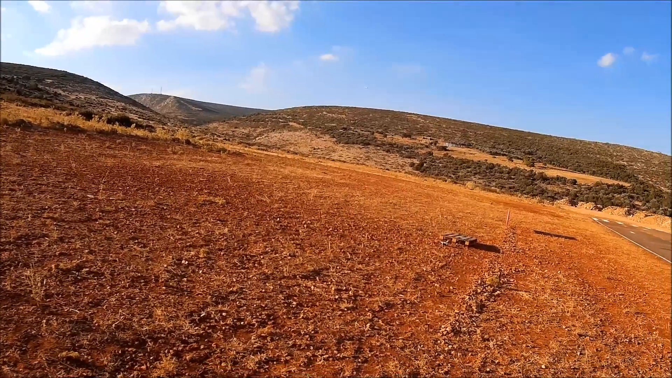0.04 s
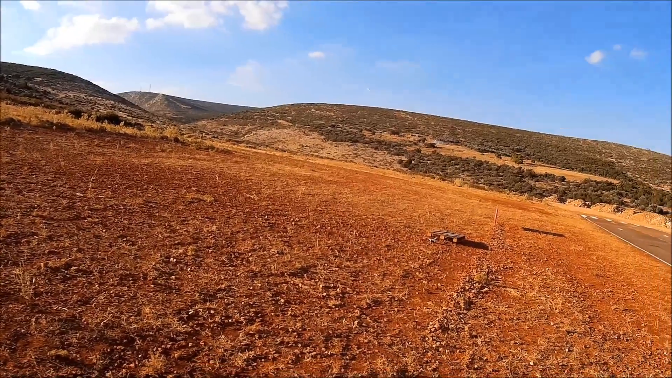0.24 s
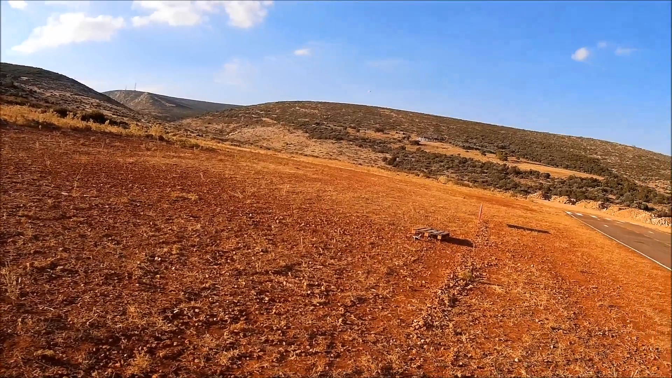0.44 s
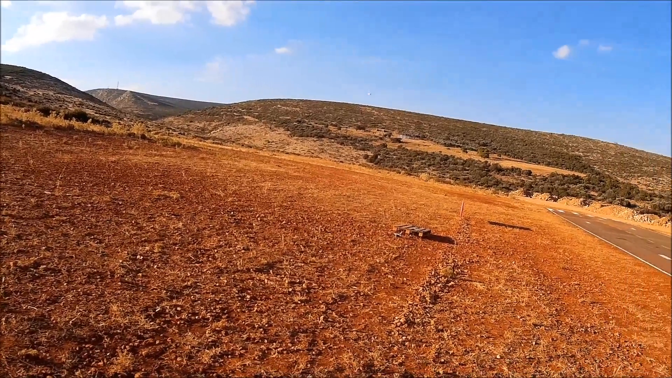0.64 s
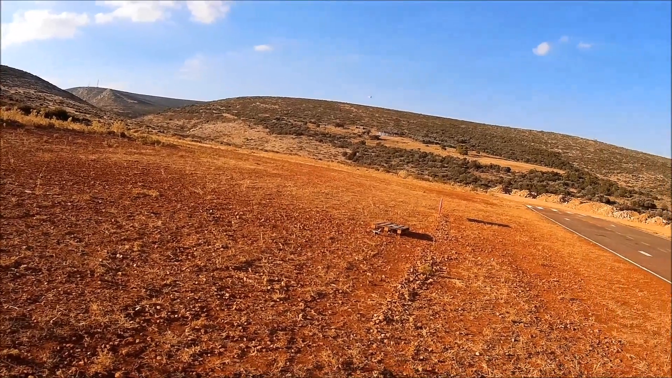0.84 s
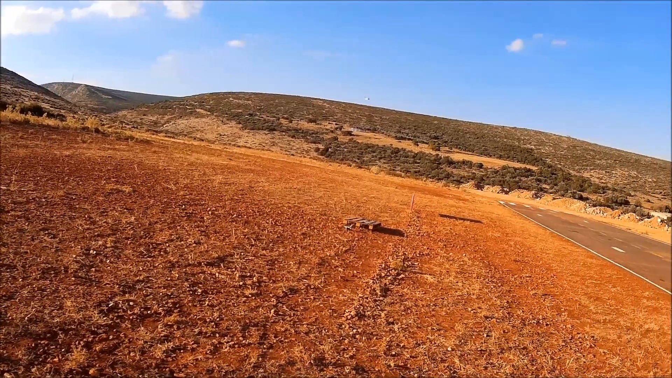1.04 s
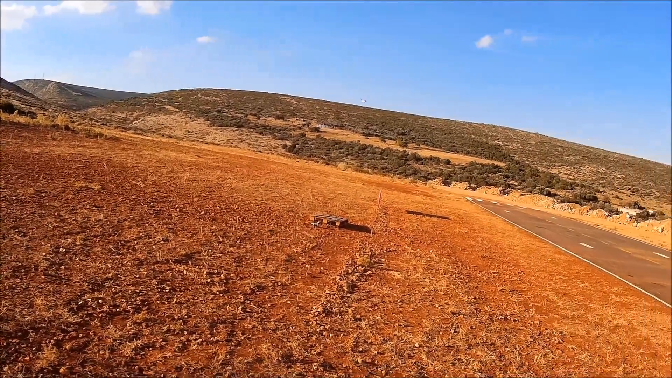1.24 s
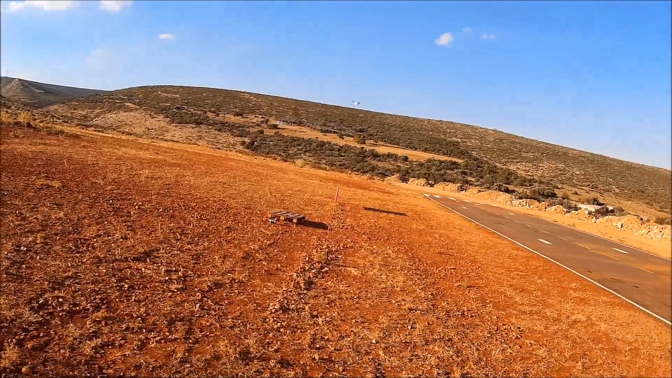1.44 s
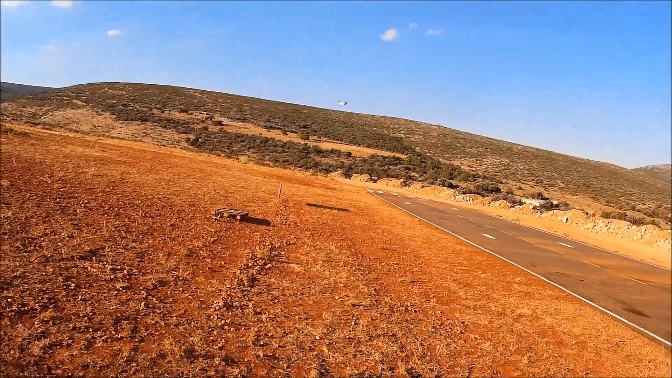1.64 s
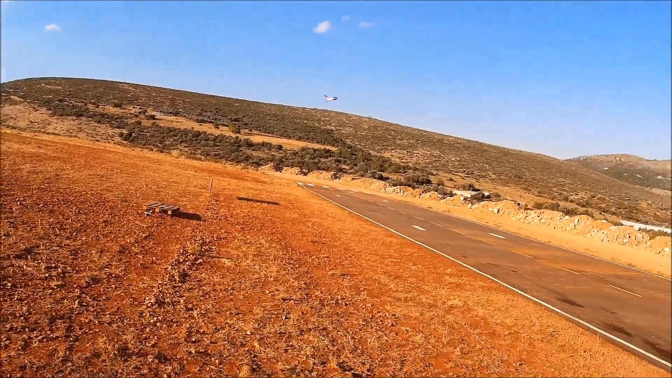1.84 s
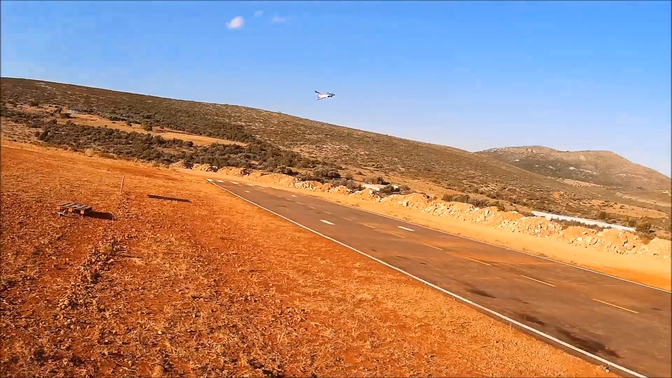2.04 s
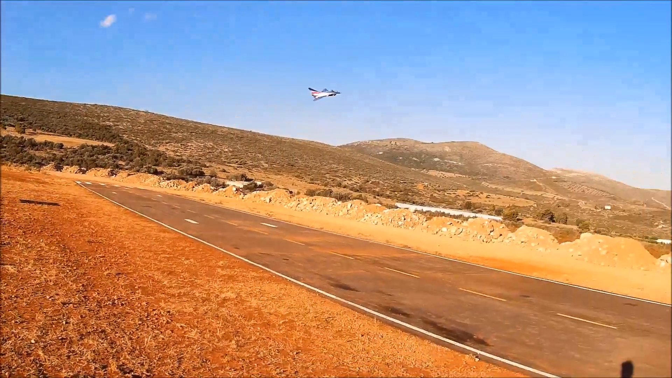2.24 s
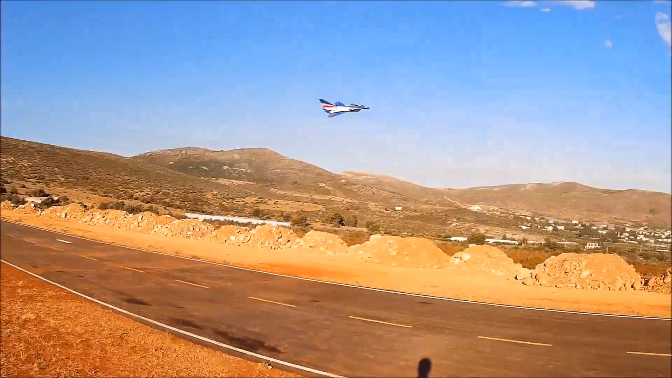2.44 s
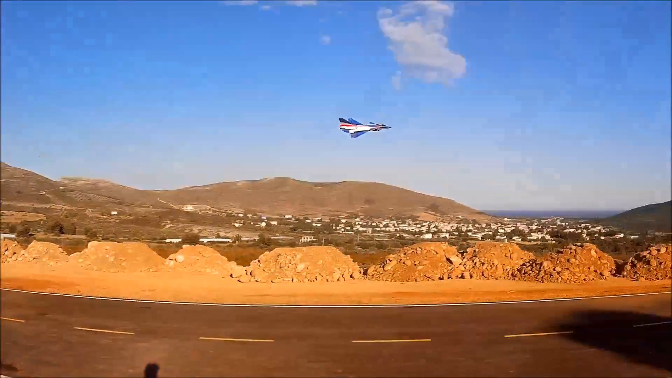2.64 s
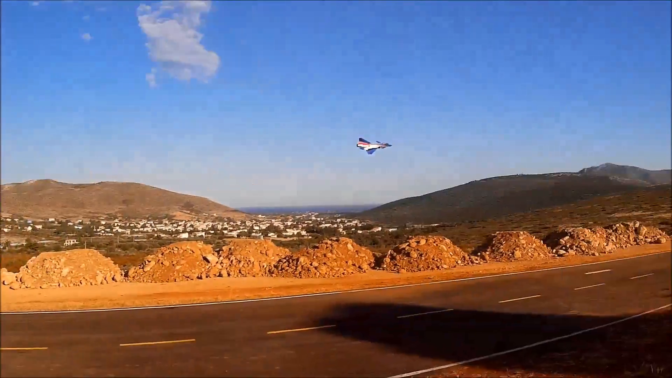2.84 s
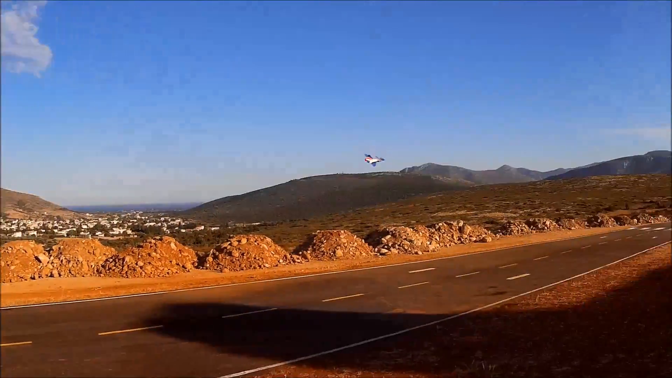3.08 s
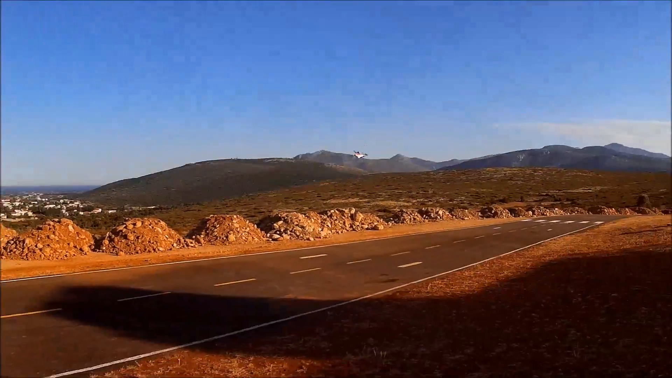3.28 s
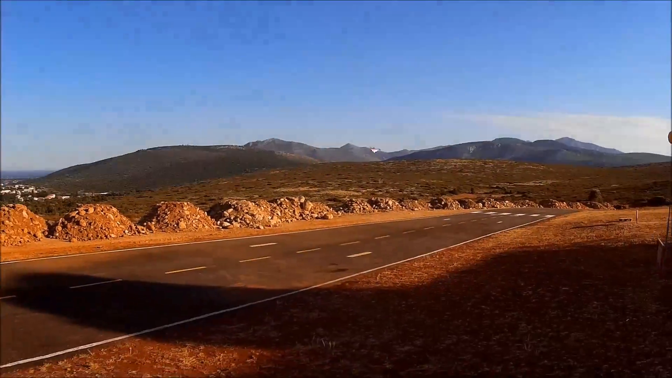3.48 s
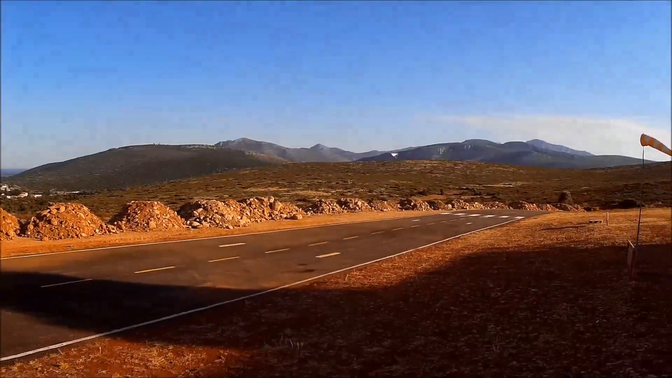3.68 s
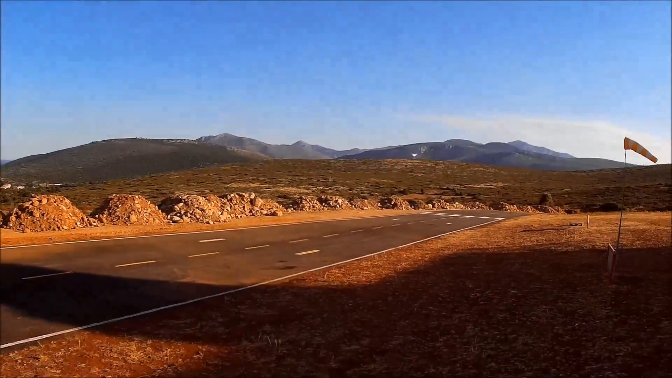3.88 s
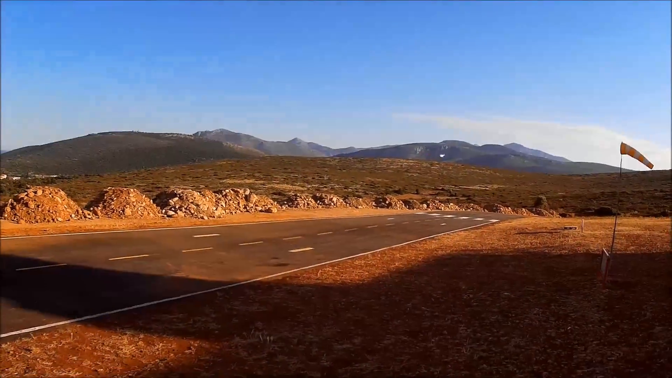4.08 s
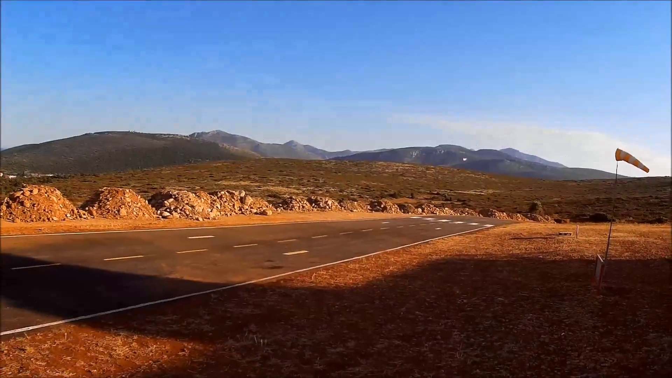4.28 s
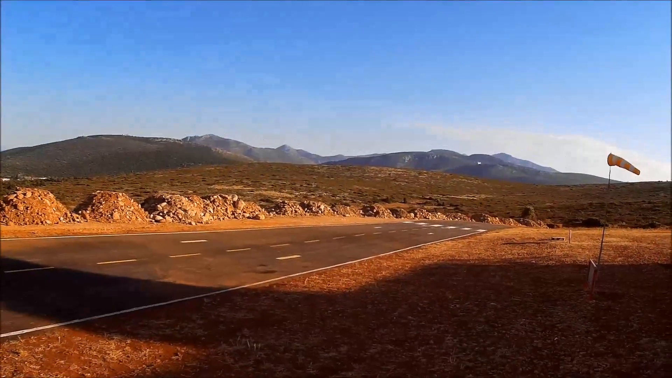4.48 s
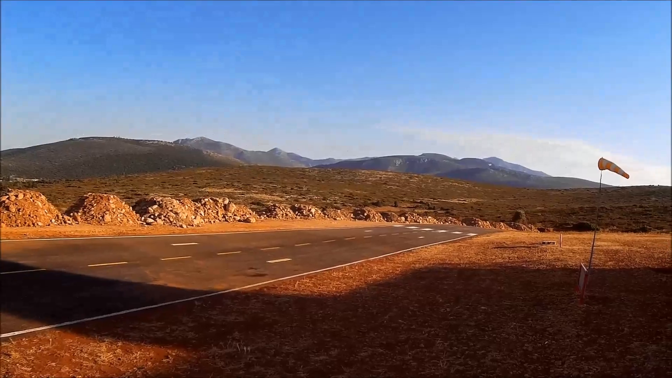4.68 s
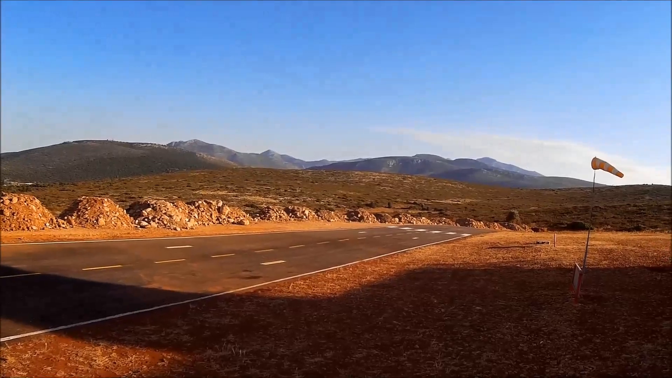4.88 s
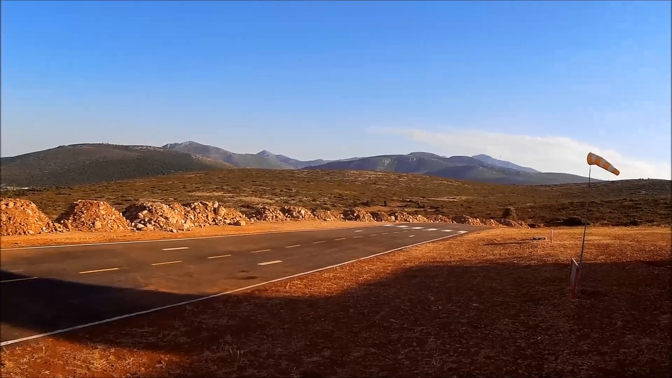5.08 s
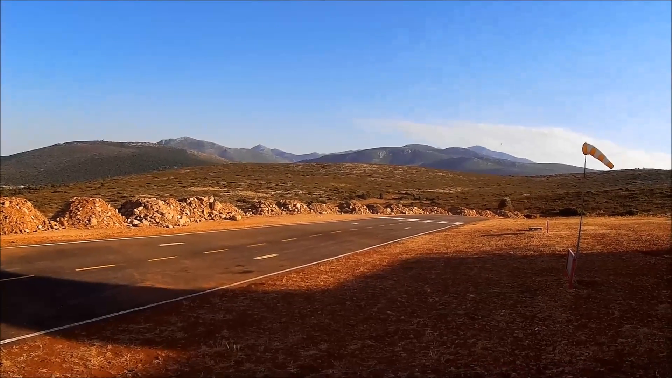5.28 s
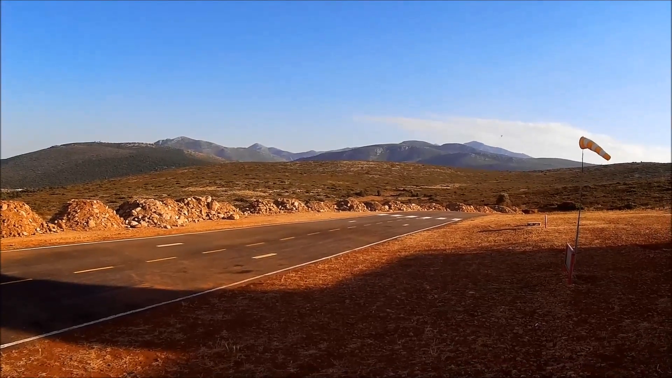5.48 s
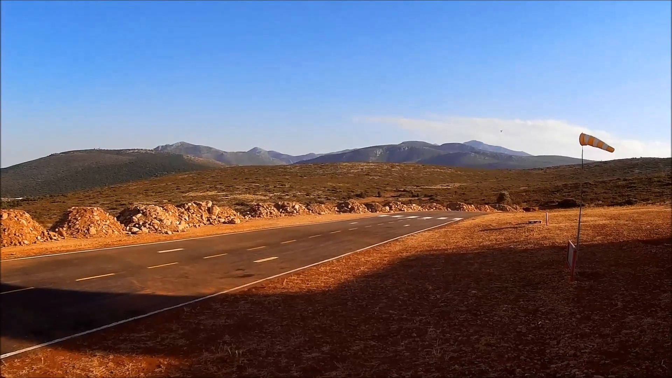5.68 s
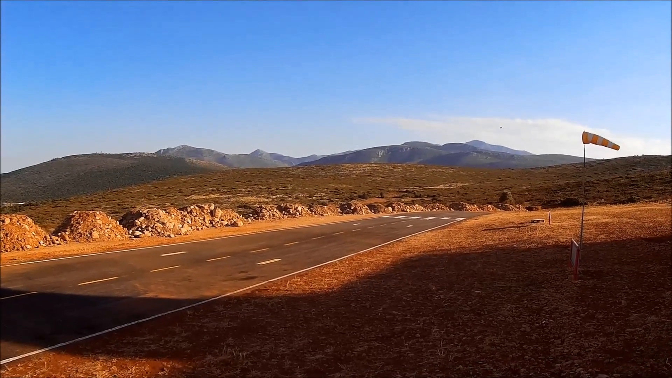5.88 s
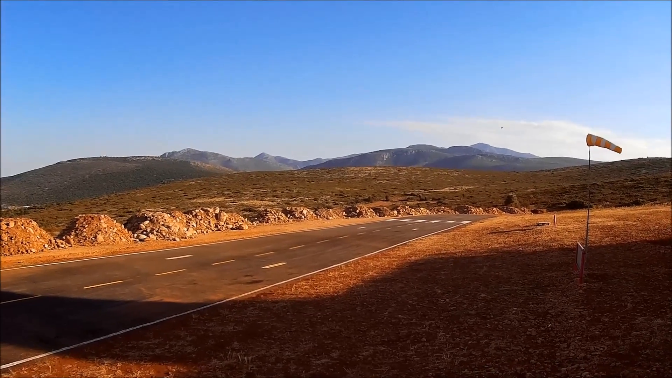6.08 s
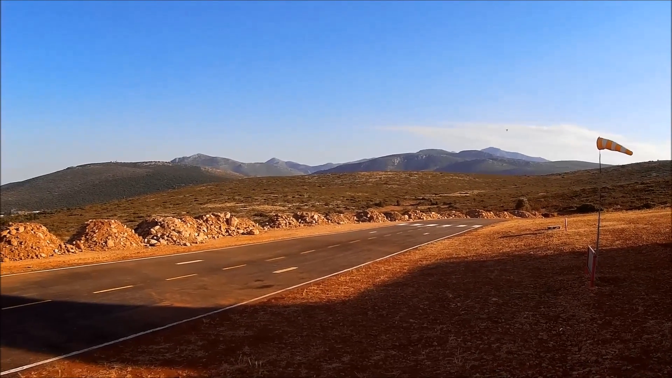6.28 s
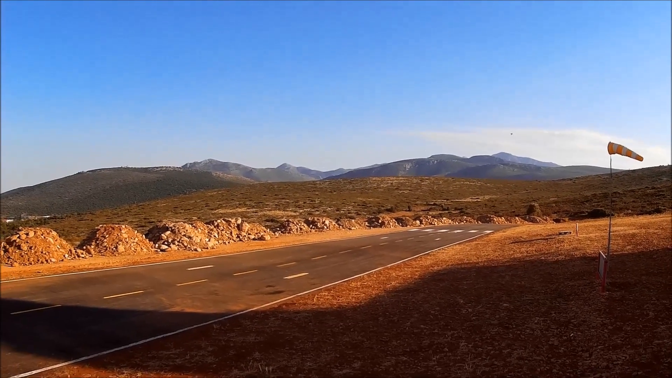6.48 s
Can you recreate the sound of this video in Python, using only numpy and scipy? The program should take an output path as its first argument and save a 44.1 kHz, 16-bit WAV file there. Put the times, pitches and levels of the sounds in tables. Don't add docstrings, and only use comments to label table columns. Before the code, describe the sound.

Open, dry countryside, heard through a small microphone with a ringing, bright treble. From 0 s a model jet approaches: a steady, fairly low electric fan whine, around 450 Hz with overtones, mixed with rushing blown air that surges and flickers, notably near 0.2, 0.5 and 0.9 s. It grows steadily from 1.5 s, while low wind thumps gather, strongest around 2.2 to 2.9 s. The jet passes closest at about 2.7 s, loud and hissy, its pitch gliding down by roughly a fifth to a quarter as a hollow, comb-like ground echo sweeps through the noise. Sharp wind slaps hit at 3.2 to 3.4 s. The whine quickly weakens and the rush recedes, duller and wavering, with brief swells near 4.1, 5.0 and 5.7 s. More gusts and small slaps come from 5.3 to 6.4 s. By 6.5 s the jet is faint above a barely audible wind murmur and slight hiss.

```python
import sys
import numpy as np
from scipy import signal
from scipy.fft import rfft, irfft, next_fast_len
from scipy.io import wavfile
from scipy.ndimage import map_coordinates

SR = 44100
rng = np.random.default_rng(int(sys.argv[2]) if len(sys.argv) > 2 else 0)


def linear_from_db(decibels):
    return 10 ** (np.asarray(decibels, float) / 20)


def to_wav(sig):
    pcm = np.clip(np.atleast_2d(sig), -1, 1) * 32767
    pcm = np.round(pcm).astype(np.int16)
    wavfile.write(sys.argv[1], SR, pcm.T)


N = 287708
SPEED_M_S, SOUND_M_S = 43.47, 343
MACH = SPEED_M_S / SOUND_M_S
PASS_M, PASS_S = 15.5, 2.6727
MIC_HEIGHT_M = 1.7


def noise():
    return rng.standard_normal(N)


def rms_one(x):
    return x / np.sqrt(np.mean(x ** 2) + 1e-20)


def in_time(rows):
    s, *columns = np.transpose(rows)
    return [np.interp(np.arange(N) / SR, s, c) for c in columns]


def bump(centre_s, half_s):
    return np.exp(-((np.arange(N) / SR - centre_s) / half_s) ** 2)


def drift(rate_hz):
    step = 40
    r = np.exp(-2 * np.pi * rate_hz * step / SR)
    start = rng.standard_normal(N // step + 2002)
    slow = signal.lfilter([1], [1, -2 * r, r * r], start)[2000:]
    return np.interp(np.arange(N) / step, np.arange(len(slow)), rms_one(slow))


def butter(x, kind, hz, order):
    return signal.sosfilt(signal.butter(order, hz, kind, fs=SR, output="sos"), x)


def coloured(x, points):
    size = next_fast_len(N)
    hz, level_db = np.transpose(points)
    shape = np.interp(np.log(np.arange(size // 2 + 1) * SR / size + 1), np.log(hz), level_db)
    return irfft(rfft(x, size) * linear_from_db(shape), size)[:N]


def split(x, edges_hz):
    size = next_fast_len(N)
    hz = np.arange(size // 2 + 1) * SR / size
    spectrum = rfft(x, size)
    below = [1 / (1 + (hz / edge) ** 12) for edge in edges_hz] + [1]
    return [irfft(spectrum * (b - a), size)[:N] for a, b in zip([0] + below, below)]


# [f/Hz, level/dB per Hz]
MURMUR_COLOUR = [(150, -15), (350, 3), (600, -4), (1200, -2), (2000, -16), (3800, -18), (6500, -26)]


def field():
    murmur = butter(coloured(noise(), MURMUR_COLOUR), "band", [120, 7000], order=2)
    return linear_from_db(-55.5 + 1.5 * drift(9)) * rms_one(murmur)


# [t/s, peak level/dB]
SLAPS = [(3.22, -21), (3.329, -20.5), (3.378, -21), (5.298, -31), (5.594, -23.5), (5.643, -30),
         (5.677, -32), (5.786, -20.5), (5.839, -23), (6.099, -27.5), (6.286, -31), (6.427, -28)]


def slaps():
    kicks = np.zeros(N) + 1e-18
    for s, peak_db in SLAPS:
        kicks[round(s * SR)] = linear_from_db(peak_db - 3.5) * rng.choice([-1, 1])
    r = linear_from_db(-60 / (0.051 * SR))
    w = 2 * np.pi * 210 / SR
    swing = signal.lfilter([0, np.sin(w)], [1, -2 * r * np.cos(w), r * r], kicks)
    return butter(swing, "low", 480, order=2)


# [t/s, half length/s, rumble level/dB, buffet level/dB]
GUSTS = [(.2, 0.07, -60, -55), (1.297, 0.034, -55, -48), (1.484, 0.063, -40, -47),
         (1.582, 0.035, -48, -42.5), (1.66, 0.028, -47, -44), (1.826, .12, -44, -51.5),
         (2.025, 0.061, -42, -40.5), (2.13, 0.048, -41, -36.5), (2.223, 0.029, -37, -31.5),
         (2.25, 0.025, -42, -35), (2.342, 0.069, -36, -31.5), (2.455, 0.049, -43, -37.5),
         (2.577, 0.048, -43, -31.5), (2.718, 0.062, -36, -31), (2.864, 0.056, -40, -40),
         (2.954, 0.034, -42, -46), (3.08, 0.046, -40.5, -46.5), (3.224, 0.035, -33.5, -31.5),
         (3.317, 0.022, -34, -33), (3.384, 0.017, -32, -30), (3.692, 0.49, -54.5, -61),
         (4.07, .06, -54, -76), (4.26, 0.065, -41, -49), (4.47, 0.072, -44.5, -44),
         (4.814, .15, -49, -57.5), (5.251, 0.082, -41, -51), (5.694, 0.072, -43, -35.5),
         (5.896, 0.063, -45, -39.5), (6.066, 0.07, -46, -51), (6.34, 0.19, -49.5, -49)]


def wind():
    rumble_gain, buffet_gain = linear_from_db(-58.5), linear_from_db(-66)
    for s, half_s, rumble_db, buffet_db in GUSTS:
        bell = bump(s, half_s)
        rumble_gain = rumble_gain + linear_from_db(rumble_db) * bell
        buffet_gain = buffet_gain + linear_from_db(buffet_db) * bell
    lumps = drift(37)
    rumble = rms_one(butter(noise(), "band", [20, 95], order=2))
    buffet = butter(butter(noise(), "band", [95, 290], order=2), "low", 510, order=2)
    thumps = rms_one(linear_from_db(2.55 * lumps) * buffet)
    return rumble_gain * linear_from_db(0.28 * lumps) * rumble + buffet_gain * thumps + slaps()


# [t/s, height/m]
HEIGHT = [(0, 17.75), (1, 10.66), (1.7, 6.95), (2.1, 6.81), (2.35, 6.28), (2.55, 6.3), (2.75, 5.83),
          (2.95, 5.7), (3.3, 5.88), (3.6, 5.71), (4.2, 7.07), (5, 10.14), (5.6, 14.5), (6.52, 20.5)]


def flight():
    t = np.arange(N) / SR - PASS_S + PASS_M / SOUND_M_S
    wait = np.sqrt(MACH ** 2 * t ** 2 + (1 - MACH ** 2) * (PASS_M / SOUND_M_S) ** 2)
    sent = (t - wait) / (1 - MACH ** 2)
    r = np.hypot(SPEED_M_S * sent, PASS_M)
    detour_m = np.sqrt(r ** 2 + 4 * MIC_HEIGHT_M * in_time(HEIGHT)[0]) - r
    return r, SPEED_M_S * sent / r, detour_m / SOUND_M_S * SR


# [t/s, gain/dB, half length/s, lean/dB per octave]
SWELLS = [(0.217, 7.5, 0.068, -3.5), (0.467, 6.5, 0.063, -2.5), (0.606, 5, 0.062, -3.5),
          (0.727, -1, 0.035, 0), (0.913, 9, 0.093, -2.5), (1.112, 0.5, .04, 0.5), (1.263, 2.5, 0.057, 2.2),
          (1.404, 0, 0.07, -1.5), (1.567, 3.5, 0.06, 2.5), (1.692, 4, 0.054, 1.5), (1.883, 2.5, 0.033, 3),
          (2.003, 3.5, 0.039, 0), (2.08, 3, 0.026, 1), (2.214, 1, 0.049, 2.8), (2.396, 1, 0.073, 0.6),
          (2.574, -0.5, 0.02, .3), (2.89, 2, 0.075, -0.6), (3.164, 3, 0.029, 1), (3.35, 1.5, 0.05, -1),
          (3.5, .5, 0.033, 1.5), (3.614, 2.5, 0.025, 0.5), (3.826, 2, 0.076, -1.5), (3.924, 1.5, 0.047, 0),
          (4.1, 3, 0.085, -4.2), (4.224, 3.5, 0.047, -0.5), (4.388, -0.5, 0.14, -1.5), (6.51, -1, .04, -12),
          (4.97, 7.5, 0.13, -3.5), (5.082, 1, 0.044, .5), (5.73, 7, 0.055, -5)]


def swell():
    return sum(np.outer([gain_db, lean_db], bump(s, half_s)) for s, gain_db, half_s, lean_db in SWELLS)


# [t/s, level/dB]
THRUST = [(0, -2.5), (.4, -5.5), (.8, -2), (1.4, -0.5), (1.8, -1), (2.4, -0.17), (2.75, -0.5), (3.1, -1.5),
          (3.6, -1), (3.75, -3.5), (4.4, -1.5), (4.62, -7), (5.2, -8), (5.6, -6.5), (5.95, -7), (6.2, -14),
          (6.35, -10), (6.52, -13.5)]


def thrust_db(r):
    return in_time(THRUST)[0] - 20 * np.log10(r / PASS_M)


def facing_db(astern, astern_db, abeam_db):
    return astern_db * astern + abeam_db * (1 - astern ** 2)


# [f/Hz, level/dB]
ECHO_COLOUR = [(400, -5), (1100, -3.5), (2000, -5), (2600, -3), (3200, -7), (3800, -13), (4300, -11),
               (6200, -12), (6700, -24), (8000, -16), (15000, -20)]
# [t/s, echo level/dB]
ECHO_GAIN = [(0, -3), (1.8, -1.5), (2.4, -0.9), (3.3, -0.5), (4.5, -0.5), (4.9, -5), (6.52, -4)]


def ground_echo(x, lag):
    echo = coloured(x, ECHO_COLOUR)
    echo = signal.filtfilt(*signal.iirnotch(1780, 5, SR), echo)
    jitter = .012 * drift(6) * SR / 1000
    late = map_coordinates(echo, [np.arange(N) - lag - jitter], order=3, mode="reflect")
    return x + linear_from_db(in_time(ECHO_GAIN)[0]) * late


PATCH_HZ = 700, 1100, 1500, 2300, 3300, 4300, 5200, 6200, 7500, 9000, 11000, 13200


def twinkle(x, depth_db):
    parts = split(x, PATCH_HZ)
    slow = [drift(5) + .6 * drift(14) for _ in range(len(parts) + 1)]
    return sum(part * linear_from_db(depth_db * .6 * (a + b)) for part, a, b in zip(parts, slow, slow[1:]))


# [f/Hz, level/dB per Hz]
ROAR = [(120, -32), (250, -10), (450, -0.5), (700, -1.5), (1050, 4), (1500, 1.5), (1750, 1.5), (2100, -5),
        (2600, -1.5)]
# [f/Hz, level/dB per Hz]
HOUSING = [(3130, 2.5), (3850, 10), (4620, -0.5), (5500, 7), (6000, 3), (7000, -24.5), (7950, -13.5),
           (8900, -25.5), (10100, -11.5), (11050, -25.5), (12200, -14), (13500, -32), (14200, -26),
           (15600, -49)]
SPLIT_HZ = 1800, 3000, 6950, 11000
# [level at pass distance/dB, loss/dB per m, gain astern/dB, gain abeam/dB, share of a swell]
RANGES = [
    (-25, 0.0351, -.5, -1, 0.39),
    (-32, 0.03, -0.5, -2, 0.38),
    (-23, 0.0641, 0, -.5, 1.11),
    (-37, 0.09, 2, 0, 1.2),
]
RANGE_OCTAVES = -2, -1, 0, 1
# [t/s, half length/s, level/dB]
THROAT_LOBES = [
    (2.25, 0.23, 2),
    (2.9, 0.21, -4.5),
]


def jet(r, astern, lag, eddies):
    levels_db = []
    for (db, loss_db, astern_db, abeam_db, share), octaves in zip(RANGES, RANGE_OCTAVES):
        level_db = thrust_db(r) + db - loss_db * (r - PASS_M) + facing_db(astern, astern_db, abeam_db)
        levels_db.append(level_db + share * (eddies[0] + octaves * eddies[1]))
    roar_db, throat_db, rush_db, hiss_db = levels_db
    throat_db = throat_db + sum(db * bump(s, half_s) for s, half_s, db in THROAT_LOBES)
    air = coloured(ground_echo(noise(), lag), ROAR + HOUSING)
    depth_db = np.clip((-16 - rush_db) / 16, .55, 1.5)
    roar, throat, rush, hiss, top = split(twinkle(air, depth_db), SPLIT_HZ)
    top = linear_from_db(.38 * (hiss_db + 38)) * top
    low = linear_from_db(roar_db) * rms_one(roar) + linear_from_db(throat_db) * rms_one(throat)
    high = linear_from_db(hiss_db + 1.1 * drift(32)) * (hiss + top) / np.std(hiss)
    return low + linear_from_db(rush_db) * rms_one(rush) + high


# [t/s, f/Hz]
SHAFT = [(0, 393.8), (.5, 393.0), (1.1, 392.6), (1.5, 393.0), (1.9, 394.1), (2.4, 393.4), (3, 393.7),
         (4.5, 393.5), (5.5, 392.3), (6.52, 392)]
# [t/s, level/dB]
WHINE = [(0, -24.5), (.5, -19), (.9, -14), (1.5, -18.5), (2.1, -17), (2.4, -17.5), (2.7, -22.5), (2.9, -26),
         (3.3, -31.5), (3.7, -36), (4.3, -39.5), (5, -41), (5.5, -44), (6.52, -48)]
# [t/s, level/dB]
STRAIN = [(0, -0.5), (1, -3.5), (1.8, 1.5), (2.2, 2), (2.5, -1), (2.8, .5), (3.2, 0.5), (3.8, -1.5),
          (4.6, 0.5), (6.52, -5)]
# [level/dB, gain astern/dB, gain abeam/dB, echo share 0-1]
LOW_VOICE = [
    (-0.9, 2.7, 2.7, 0.79),
    (-7.5, 2.5, -7.5, 0.62),
    (-19.5, 11, 9.5, .75),
    (-17, 7.5, 10, 0.35),
]
# [t/s, vane level/dB, blade level/dB]
BEAM = [(0, -38, -40), (.9, -36, -32), (1.7, -40, -32), (2.2, -44, -31), (2.5, -50, -31), (2.68, -50, -48),
        (3.3, -42, -44), (3.6, -31, -37), (4.3, -30, -38), (4.7, -44, -35), (6.52, -48, -34)]


def rotor(r, astern, lag, eddies):
    heard_hz = in_time(SHAFT)[0] / (1 + astern * MACH)
    turn = 2 * np.pi * np.cumsum(heard_hz) / SR
    late = turn - lag * np.gradient(turn)
    whine_db = in_time(WHINE)[0] - 20 * np.log10(r / PASS_M)
    strain_db = in_time(STRAIN)[0]
    out = np.zeros(N)
    for k, (db, astern_db, abeam_db, echo) in enumerate(LOW_VOICE, 1):
        level_db = whine_db + db + facing_db(astern, astern_db, abeam_db) + (k > 1) * strain_db
        waver = rng.uniform(0, 6) + .08 * k * drift(22)
        waver_db = .45 * k + .006 * r * (1.5 + astern) * 2
        tone = np.sin(k * turn + waver) + echo * np.sin(k * late + waver)
        out += linear_from_db(level_db + waver_db * drift(26)) * tone
    high_db = thrust_db(r) + .8 * eddies[0]
    vane_db, blade_db = [high_db + db for db in in_time(BEAM)]
    high = [(11, vane_db),
            (12, blade_db),
            (13, blade_db - 10 + drift(1.8)),
            (6, blade_db - 20)]
    for k, level_db in high:
        out += linear_from_db(level_db - 1 + 2.4 * drift(15)) * np.sin(k * turn + .9 * drift(18))
    return np.sqrt(2) * out


def scene():
    path = *flight(), swell()
    return (field() + wind() + jet(*path) + rotor(*path))[None]


def band_limit(x):
    return signal.sosfilt(signal.butter(12, 15640, fs=SR, output="sos"), x)


def record(dry):
    hiss = linear_from_db(-70.5) * rms_one(butter(noise(), "band", [3000, 15000], order=1))
    return band_limit(dry + hiss)


dry = scene()
out = record(dry)
to_wav(out)
```